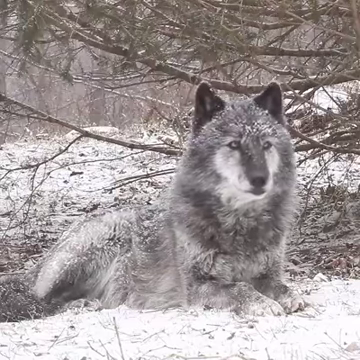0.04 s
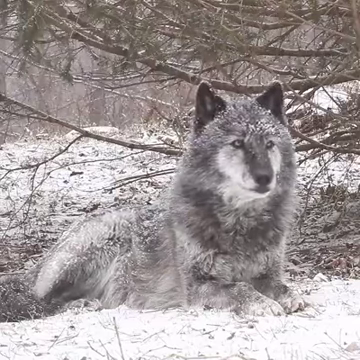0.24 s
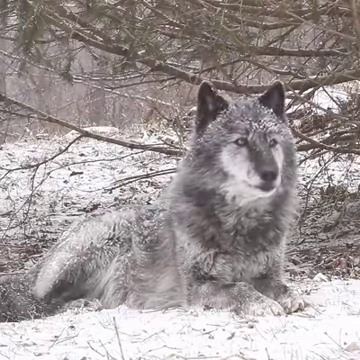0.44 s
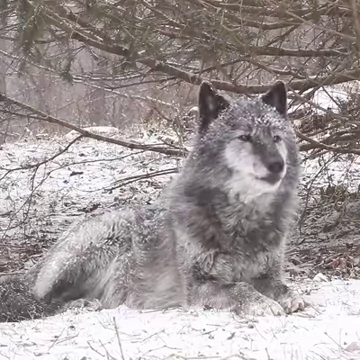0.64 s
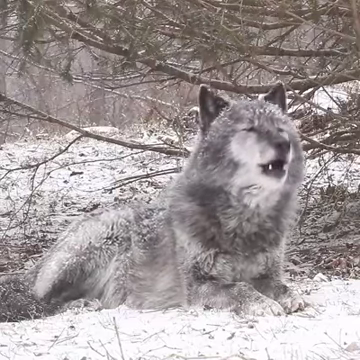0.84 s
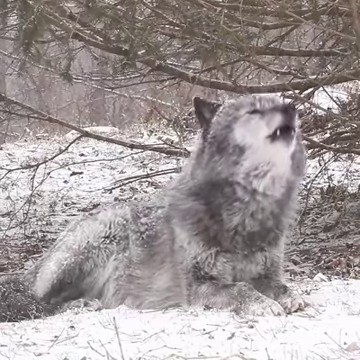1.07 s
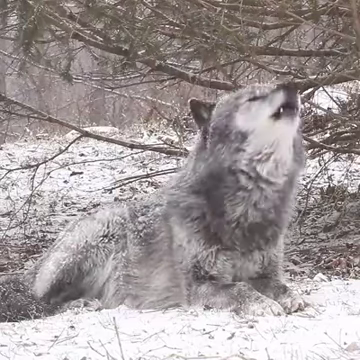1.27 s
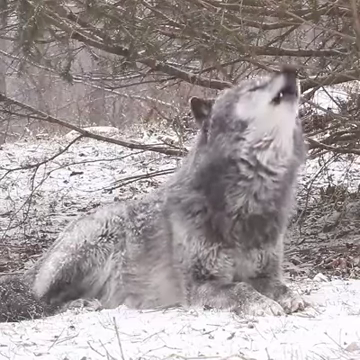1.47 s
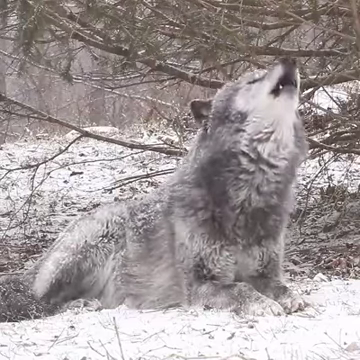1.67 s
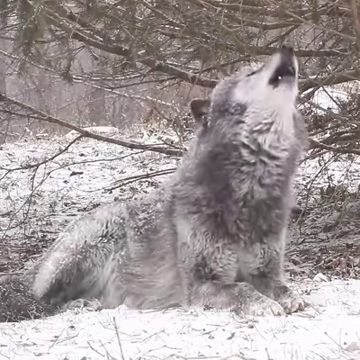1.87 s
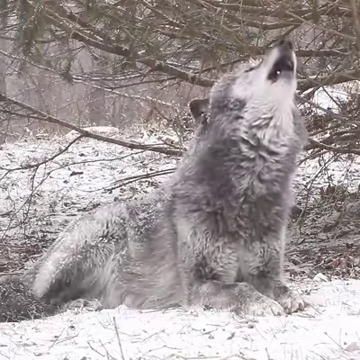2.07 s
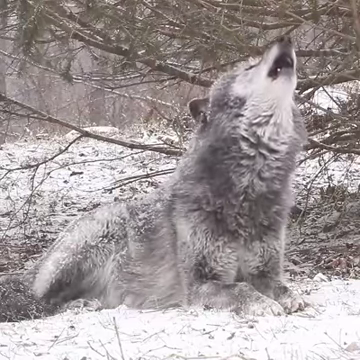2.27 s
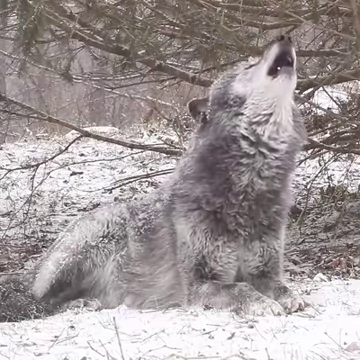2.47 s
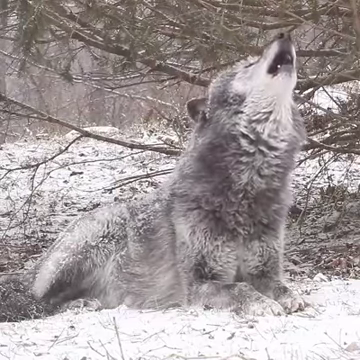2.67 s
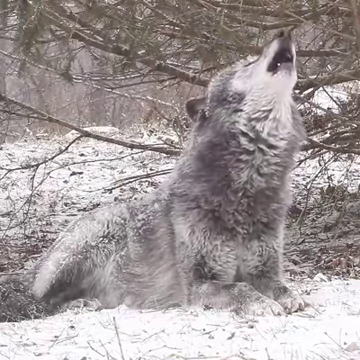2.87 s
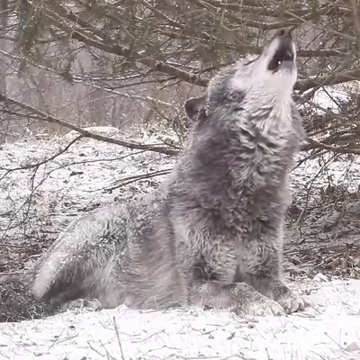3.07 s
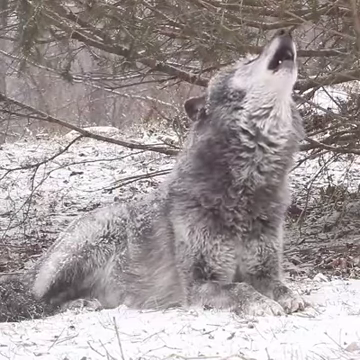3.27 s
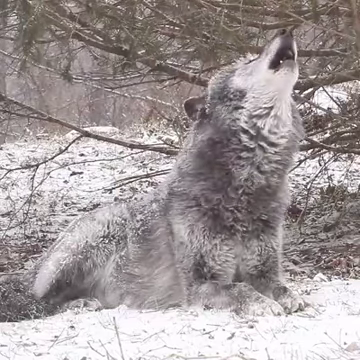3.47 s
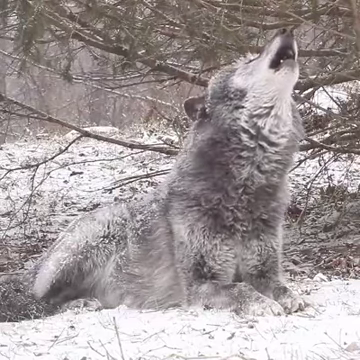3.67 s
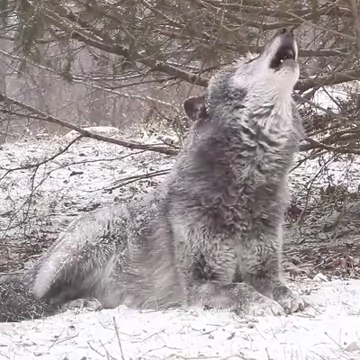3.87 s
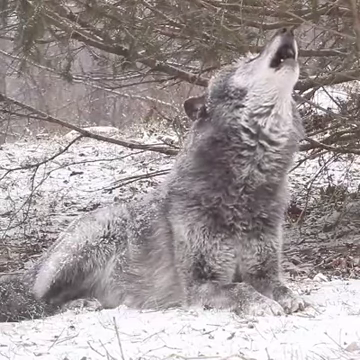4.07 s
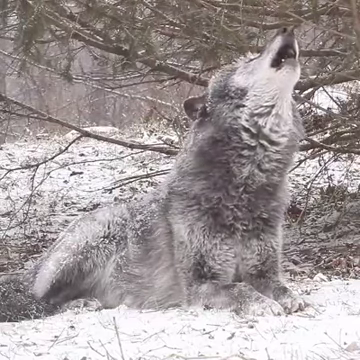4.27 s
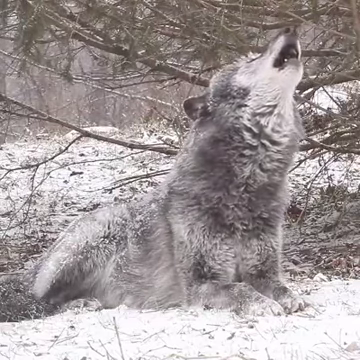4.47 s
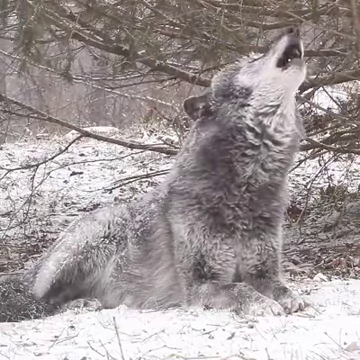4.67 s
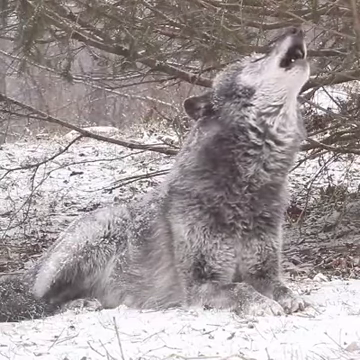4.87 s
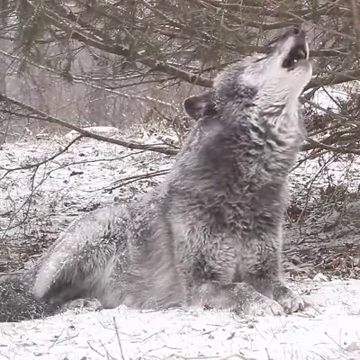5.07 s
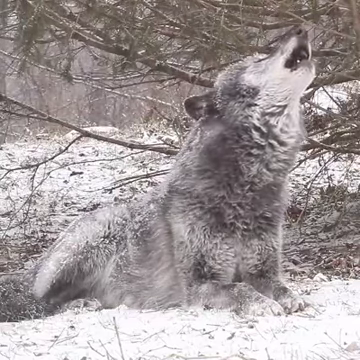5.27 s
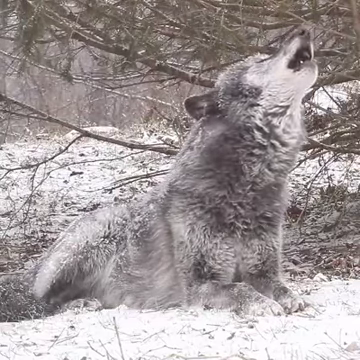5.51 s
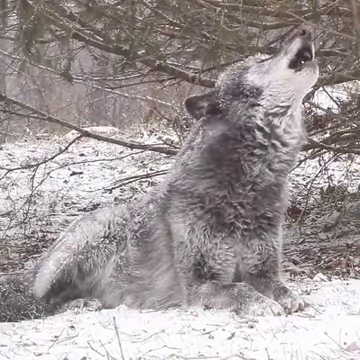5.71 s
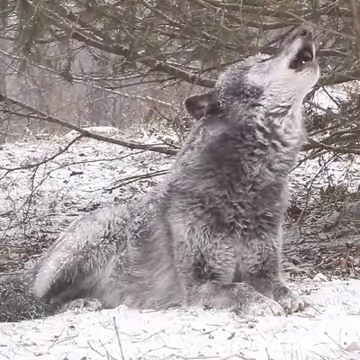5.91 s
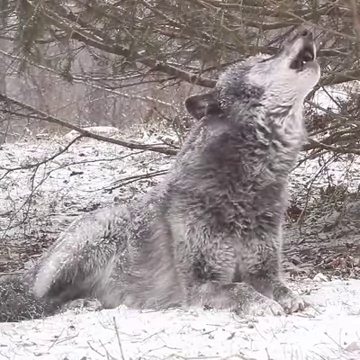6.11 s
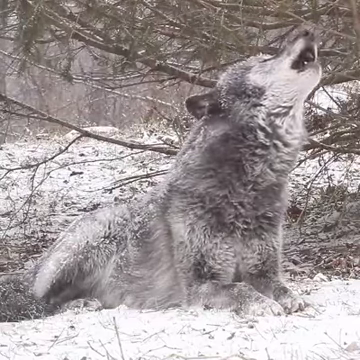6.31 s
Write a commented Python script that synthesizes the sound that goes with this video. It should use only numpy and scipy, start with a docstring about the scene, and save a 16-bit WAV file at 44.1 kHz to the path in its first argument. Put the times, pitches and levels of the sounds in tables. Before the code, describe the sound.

After a quiet snowy hush, a wolf lifts one long pure howl; a second breaks upward over it, and a faint distant third joins.

```python
"""A snowy wood hushes softly all the way through: shaped noise, with a few short, faint noise bursts.
A wolf starts one long howl at about 1.7 s: an almost pure tone, weak overtones, hissing breath and thin whistles.
At about 3.5 s a second wolf breaks up from a low note, rises above the first and sinks to nearly the same
pitch, so the two beat slowly. From about 5.3 s a third, far-off wolf joins as one faint, wavering tone.
Sparse echoes off the trunks follow the voices; a limiter evens the level, and the sound is nearly mono."""
import sys
import numpy as np
from scipy import signal
from scipy.fft import rfft, irfft, next_fast_len
from scipy.io import wavfile
from scipy.ndimage import uniform_filter1d

SR = 44100
rng = np.random.default_rng(int(sys.argv[2]) if len(sys.argv) > 2 else 0)


def dump_mix(stems):
    """Bounce the given channels to the path in sys.argv[1] as a 16-bit WAV at rate SR."""
    frames = np.atleast_2d(stems).T  # one column per channel
    limited = np.clip(frames, -1, 1)  # hard clip at full scale
    pcm = np.round(limited * 32767).astype(np.int16)
    wavfile.write(sys.argv[1], SR, pcm)


N = 279925
T = np.arange(N) / SR
EDGE_HZ = 15500  # upper limit of the overtones and of the whole sound


def gain_of(db):
    """Turns decibels into a factor."""
    return 10 ** (np.asarray(db) / 20)


def evened(x):
    """Scales a signal to rms 1."""
    return x / np.sqrt(np.mean(x ** 2) + 1e-20)


def read(points, hz):
    """Reads a spectrum curve on a logarithmic frequency axis."""
    f, value = np.transpose(points)
    return np.interp(np.log(hz + 1), np.log(f + 1), value)


def columns(rows):
    """Draws each column along time, then a soft-edged mask that is 1 while the table lasts."""
    s, *rest = np.transpose(rows)
    lasting = 1. * ((T > s[0]) & (T < s[-1]))
    return [np.interp(T, s, c) for c in rest] + [uniform_filter1d(lasting, size=400)]


def bump(s, length):
    """A smooth hump in time that peaks at 1."""
    return np.exp(-(2 * (T - s) / length) ** 2)


def wander(hz):
    """Random drift of rms 1, mostly slower than hz."""
    return evened(signal.lfilter(*signal.butter(2, hz, fs=SR), rng.standard_normal(N)))


def band(hz, width, n=N):
    """Noise passed twice through one resonance, which gives it a rounded peak."""
    b, a = signal.iirpeak(min(hz, .45 * SR), hz / width, fs=SR)
    once = signal.lfilter(b, a, rng.standard_normal(n))
    return evened(signal.lfilter(b, a, once))


def steep(hz, width):
    """Noise in a band with steep edges."""
    edges = [hz - width / 2, hz + width / 2]
    sos = signal.butter(3, edges, "bandpass", fs=SR, output="sos")
    return evened(signal.sosfilt(sos, rng.standard_normal(N)))


def bursts(rows, spread, grain_db):
    """Short noises that swell and fade, with a grainy level; spread is resonance width / centre."""
    out = np.zeros(N)
    for s, length, db, hz in rows:
        part = out[round(s * SR):][:round(length * SR)]
        steps = np.repeat(rng.standard_normal(60), 150)
        grain = gain_of(grain_db * uniform_filter1d(steps, size=100))[:len(part)]
        noise = band(hz, spread * hz, n=9000)[:len(part)]
        part += gain_of(db) * np.hanning(len(part)) * grain * noise
    return out


# colour of the hush: f/Hz, relative level/dB per Hz
HUSH_COLOUR = [(30, -52), (108, -1.5), (187, 0.5), (520, -8.5), (900, -6.5), (1600, -13.5), (2800, -25),
               (7000, -26.5), (8000, -38.5), (8900, -26.5), (15500, -35)]
# slow rise and fall of the hush: t/s, level change/dB
HUSH_SWELL = [(0, -1.5), (2.5, 4), (6.35, 1.5)]
HUSH_DB = -46.5  # rms level before the slow swell


def hush():
    """Broad outdoor noise with drifting patches and a treble that flickers."""
    frames, hz = N // 128 + 5, np.fft.rfftfreq(512, 1 / SR)
    a, b, patches = rng.standard_normal((frames, 257, 3)).T
    patches = uniform_filter1d(patches, size=8, axis=0)  # blend neighbouring frequencies
    patches = evened(uniform_filter1d(patches, size=16, axis=1))  # blend neighbouring moments
    flicker = evened(uniform_filter1d(rng.standard_normal(frames), size=5)) * (hz[:, None] > 2500)
    z = (a + 1j * b) * gain_of(0.44 * patches + 0.43 * flicker)
    white = signal.istft(z, nperseg=512, noverlap=384)[1][:N]
    colour = gain_of(read(HUSH_COLOUR, np.fft.rfftfreq(N, 1 / SR)))
    coloured = irfft(rfft(white) * colour, N)
    return gain_of(HUSH_DB + columns(HUSH_SWELL)[0]) * evened(coloured)


# short faint noises, some low and some high:
# start t/s, length t/s, level/dB before fade and grain, centre f/Hz
FAINT_BURSTS = [(.417, .02, -56, 12400), (.711, .01, -52, 12500), (2.65, .08, -32, 350),
                (2.64, .11, -46, 2800), (5.32, .045, -33, 700), (5.525, .045, -34, 600),
                (5.77, .045, -35, 550), (5.925, .045, -34, 650)]


def faint_bursts():
    """Short faint noise bursts in broad bands, some low and some high."""
    return bursts(FAINT_BURSTS, spread=1.1, grain_db=3.)


def scattered(x):
    """Repeats a sound sparsely at random delays, dying away by 60 dB in 0.8 s."""
    at = np.arange(900, SR, 40) + rng.integers(0, 40, (SR - 861) // 40)
    taps = np.zeros(SR + 40)
    taps[at] = rng.choice([-1., 1.], len(at)) * gain_of(-60 * at / SR / 0.8)
    return signal.fftconvolve(x, taps / np.linalg.norm(taps))[:N]


def line(rows, waver_hz, octave_db):
    """One tone wavering in pitch and level, with a weak octave above it."""
    hz, db, on = columns(rows)
    turns = 2 * np.pi * np.cumsum(hz + waver_hz * wander(42)) / SR
    level = np.sqrt(2) * gain_of(db + 2.9 * wander(5.1))
    return on * level * (np.cos(turns) + gain_of(octave_db) * np.cos(2 * turns))


# howl of the far wolf: t/s, f/Hz, level/dB
THIRD_HOWL = [(5.26, 768.3, -34), (5.4, 746, -24), (5.52, 732.5, -39.5), (5.64, 729.3, -24.5),
              (5.88, 710, -20), (6.04, 725, -23.5), (6.35, 725, -25)]


def third_wolf():
    """The far wolf: a faint tone whose pitch and level waver around its table."""
    return line(THIRD_HOWL, waver_hz=1.6, octave_db=-17.5)


WHISTLE_RISE_DB, WHISTLE_FADE_DB = 13.5, 18  # how far below its peak a whistle starts and ends


def whistle(start, peak, end, from_hz, to_hz, db):
    """Swells to its peak and fades while the pitch glides evenly."""
    peak_hz = np.interp(peak, [start, end], [from_hz, to_hz])
    return [(start, from_hz, db - WHISTLE_RISE_DB), (peak, peak_hz, db), (end, to_hz, db - WHISTLE_FADE_DB)]


# long whistle near the first wolf's sixth overtone, beating with it: t/s, f/Hz, level/dB
LONG_WHISTLE = [(1.82, 4180, -44), (1.95, 4158, -35.5), (2.3, 4154, -35.5), (2.9, 4166, -43.5),
                (3.2, 4180, -57.5)]
# thin whistles, mostly at their own pitch; the 6260 Hz one lies three steps of the first wolf's pitch above the
# long whistle: start t/s, peak t/s, end t/s, first f/Hz, last f/Hz, peak level/dB
WHISTLES = [(1.603, 1.63, 1.66, 2560, 2780, -43), (1.8, 2.1, 2.95, 6260, 6250, -52),
            (1.9, 2.06, 2.9, 6710, 6680, -49), (3.8, 4.17, 4.27, 9190, 9185, -48),
            (4.14, 4.23, 4.28, 10690, 10700, -46), (4.22, 4.275, 4.36, 2605, 2625, -37),
            (4.22, 4.255, 4.29, 3400, 3360, -39), (4.3, 4.35, 4.5, 3350, 3390, -38),
            (4.23, 4.3, 4.34, 3935, 3965, -42), (4.12, 4.26, 4.32, 5600, 5370, -43),
            (4.295, 4.325, 4.39, 5350, 5310, -34), (5.22, 5.36, 5.8, 4090, 3830, -51),
            (5.4, 5.72, 6.36, 3110, 3145, -48), (5.9, 6.2, 6.5, 4560, 4610, -46)]


def whistles():
    """Thin wavering tones that ride on the howls, mostly at their own pitch."""
    tables = [LONG_WHISTLE] + [whistle(*row) for row in WHISTLES]
    return sum(line(rows, waver_hz=7.8, octave_db=-38.5) for rows in tables)


# rasps as the voices start or break: start t/s, length t/s, level/dB before fade and grain, centre f/Hz
RASPS = [(1.65, .065, -50, 11000), (3.472, .03, -34, 1450), (3.558, .04, -26, 1050), (1.59, .2, -54, 4000),
         (4.23, .11, -41, 3700), (3.51, .11, -43, 4500)]


def rasps():
    """Rough scrapes in the voices: short bursts of noise in narrow bands."""
    return bursts(RASPS, spread=.25, grain_db=3.)


def squeal(step_hz, level, whistle_hz, first_step, steps_db):
    """The vocal folds chop a whistle, which gives lines at steps of the howl's pitch."""
    db, on = columns(level)
    total = 0
    for k, step_db in enumerate(steps_db, start=first_step):
        line_level = gain_of(db + step_db + 3.9 * wander(4.1))
        hz = whistle_hz + k * step_hz + 6 * wander(30)
        total = total + line_level * np.cos(2 * np.pi * np.cumsum(hz) / SR)
    return on * np.sqrt(2) * total


# chopped whistles of the second wolf: level curve (t/s, level/dB), whistle f/Hz,
# number of the lowest step, level/dB of each step upward, added to the curve
SECOND_SQUEALS = [([(3.76, -62), (4.05, -50), (4.26, -52)], 5245, 2, [-17, -15, -30, -20, 0, -9, -16]),
                  ([(4.33, -52), (4.75, -51), (4.96, -56)], 5238, 2, [-12, -10, -20, 0, -4, -10, -13]),
                  ([(3.75, -70), (4.45, -61), (4.96, -62)], 10500, 3, [0, -2, -5])]


def second_squeals(hz):
    """The second wolf's high whistles, chopped at its own pitch."""
    return sum(squeal(hz, *row) for row in SECOND_SQUEALS)


# chopped whistles of the first wolf: level curve (t/s, level/dB), whistle f/Hz,
# number of the lowest step, level/dB of each step upward, added to the curve
FIRST_SQUEALS = [([(1.82, -63), (2.3, -59), (2.9, -67), (4.8, -62)], 10145, -1, [-5, 0, -15, -20, -2]),
                 ([(1.9, -72), (2.35, -63), (3.3, -73)], 14645, -3, [-7, -4, -6, 0])]


def first_squeals(hz):
    """The first wolf's high whistles, chopped at its own pitch."""
    return sum(squeal(hz, *row) for row in FIRST_SQUEALS)


def scooped(pitch, start, depth_hz, settle_s):
    """The held pitch, reached from below."""
    return columns(pitch)[0] - depth_hz * np.exp(-np.maximum(T - start, 0) / settle_s)


def roughness(spells):
    """How many times more the cycles waver during rough spells."""
    return 1 + sum(more * bump(s, length) for s, length, more in spells)


# a voice starts as a murmur with the mouth nearly shut, then the folds swing fully
MURMUR_S, MURMUR_DB, SHUT_DB, ATTACK_S = 0.022, -26, -10, 0.015
WAVER = .025  # phase waver of a calm voice in radians, times the overtone number
# resonances that colour the air hissing past the folds: f/Hz, width f/Hz, level/dB
MOUTH = [(2490, 700, -52.5), (3900, 940, -48.5), (6540, 3400, -64), (9850, 1000, -60), (13000, 3500, -67)]


def howl(hz, lead, effort, throat, swells, shimmer_db, breath_db, rough):
    """An almost pure fundamental; weak overtones shaped by the throat, and hiss in bands."""
    level_db, mouth_db, _ = columns(effort)
    before = effort[0][0] - T
    quiet = np.clip(before / ATTACK_S, 0, 1)
    on = np.clip((ATTACK_S + MURMUR_S - before) / ATTACK_S, 0, 1)
    level_db = level_db + MURMUR_DB * quiet
    mouth_db = mouth_db + SHUT_DB * quiet

    # both voices count their cycles from the moment of the second wolf's break
    cycles = np.cumsum(hz) / SR
    turns = 2 * np.pi * (cycles - np.interp(SECOND_SCOOP[0], T, cycles) + lead)
    tone = gain_of(level_db + 0.27 * wander(35)) * np.cos(turns)
    voiced = np.clip(gain_of(level_db + 26 + SHUT_DB * quiet), 0, 1)  # overtones start once the folds swing fully

    def opened(f):
        """An open mouth frees the treble most."""
        return gain_of(mouth_db * np.clip(np.log2(f / 1100) / 1.2, 0, 1.3))

    overtones = 0
    for k in range(2, 22):
        swell_db = sum(db * bump(s, length) for n, s, length, db in swells if round(n) == k)
        level = gain_of(read(throat, k * hz) + swell_db + shimmer_db * wander(9.9))
        level = level * opened(k * hz) * (k * hz < EDGE_HZ)
        # overtones also waver in phase; k * k spreads their starting points
        wavering = turns + WAVER * rough * wander(40)
        overtones = overtones + level * np.cos(k * wavering + k * k)

    gusts_db = 1.5 * wander(15)
    breath = sum(gain_of(db + gusts_db) * opened(f) * steep(f, w) for f, w, db in MOUTH)
    return on * (np.sqrt(2) * tone + voiced * (np.sqrt(2) * overtones + gain_of(breath_db) * breath))


# held pitch of the second wolf; its small gap to the first sets the moments of the beats: t/s, f/Hz
SECOND_PITCH = [(3.78, 746.03), (4.16, 757.91), (4.22, 768.52), (4.31, 810.73), (4.35, 792.43),
                (4.48, 775.52), (4.7, 759.89), (4.88, 752.35), (5.0, 714.64), (5.27, 696.45),
                (5.39, 691.01), (5.87, 687.08), (5.99, 695.01), (6.11, 696.03), (6.35, 692.55)]
# scoop up to that pitch: start t/s, depth f/Hz, settling t/s
SECOND_SCOOP = (3.577, 194.08, .05)
# low note before the break: rise starts t/s, f/Hz, rise/Hz per s
LOW_NOTE = (3.53, 384, 700)
BREAK_S = .014  # length of the break


def second_hz():
    """A low rising note that breaks upward into the howl."""
    start, low_hz, rise = LOW_NOTE
    low = low_hz + rise * np.maximum(T - start, 0)
    broken = np.clip((T - SECOND_SCOOP[0]) / BREAK_S + 1, 0, 1)
    return low + (scooped(SECOND_PITCH, *SECOND_SCOOP) - low) * broken


# t/s, fundamental level/dB, mouth opening as level/dB on overtones and breath
SECOND_EFFORT = [(3.486, -7.5, -10), (3.563, -6.5, -1.5), (3.58, -17.5, -19.5), (3.63, -9.5, -9),
                 (3.7, -5, 0.7), (3.9, -14, 0), (4.0, -12.5, 2), (4.3, -21.5, -1), (4.401, -29.5, 3.5),
                 (4.502, -12, 1), (4.8, -16.5, 1.1), (5.0, -5.5, -3.5), (5.2, -2.5, -1), (5.4, -9, -4.5),
                 (6.0, -6, -7.5), (6.36, -7.5, -6)]
# overtone strength by frequency, at mouth opening 0: f/Hz, level/dB
SECOND_THROAT = [(1150, -27.5), (1500, -28.5), (2250, -53), (3130, -48.5), (3850, -40.5), (4500, -55),
                 (5600, -64.5), (8200, -89)]
# single overtones that swell or dip while the mouth changes shape:
# overtone number, middle t/s, length t/s, level change/dB
SECOND_SWELLS = [(3, 3.48, .035, -14), (4, 3.555, .13, -16), (3, 3.75, 0.18, 23.5), (3, 4.8, 0.38, 20),
                 (2, 4.29, .1, -12), (4, 4.43, 0.45, 13), (10, 3.53, .09, 11), (11, 3.53, .06, 17),
                 (12, 3.55, .06, 22), (4, 3.615, .035, 26), (5, 4.4, .22, 6), (7, 5.03, 0.36, 18),
                 (7, 4.9, 0.085, -60), (5, 5.9, 1.5, -10), (2, 5.7, 1.1, 5)]
# rough spells at the break and the peak: middle t/s, length t/s, extra waver (times calm)
ROUGH_SPELLS = [(3.575, .05, 20), (4.285, .09, 20)]
SECOND_LEAD = 0.37  # cycles the second voice leads the first at the break


def second_wolf(hz):
    """The second voice, which turns rough at its break and at its peak."""
    return howl(hz, SECOND_LEAD, SECOND_EFFORT, SECOND_THROAT, SECOND_SWELLS,
                shimmer_db=1.5, breath_db=0.0, rough=roughness(ROUGH_SPELLS))


# held pitch of the first wolf: t/s, f/Hz
FIRST_PITCH = [(1.9, 683.69), (2.0, 700.86), (2.1, 703.0), (2.6, 689.75), (3.0, 684.53), (3.4, 690.67),
               (3.6, 687.12), (4.2, 692.86), (6.35, 680.64)]
# scoop up to that pitch: start t/s, depth f/Hz, settling t/s
FIRST_SCOOP = (1.69, 69, .06)


def first_hz():
    """One long held note, scooped up from below."""
    return scooped(FIRST_PITCH, *FIRST_SCOOP)


# t/s, fundamental level/dB, mouth opening as level/dB on overtones and breath
FIRST_EFFORT = [(1.708, -6.5, -7), (1.799, -2, -4.5), (1.951, -6, 2.5), (2.5, -5, 3.5), (2.8, -3.5, -0.6),
                (3.549, -3, 0), (3.701, -6, -1.5), (4.451, -7, -5), (4.899, -10, -11), (5.25, -3.5, -7.5),
                (5.649, -9.5, -17), (6.36, -12.5, -17.5)]
# overtone strength by frequency, at mouth opening 0: f/Hz, level/dB
FIRST_THROAT = [(1380, -45), (2080, -50.5), (2780, -51), (3480, -59), (4180, -41.5), (4900, -69.5),
                (6270, -64), (7600, -92)]
# single overtones that swell while the mouth changes shape:
# overtone number, middle t/s, length t/s, level change/dB
FIRST_SWELLS = [(2, 1.742, .04, 7), (4, 1.795, 0.12, 16)]


def first_wolf(hz):
    """The first voice: one long howl without rough spells."""
    return howl(hz, 0, FIRST_EFFORT, FIRST_THROAT, FIRST_SWELLS,
                shimmer_db=2.0, breath_db=-4.0, rough=roughness([]))


def scene():
    """Three wolves, their echoes, faint noise bursts and the hush, in two nearly equal channels."""
    first_pitch, second_pitch = first_hz(), second_hz()
    wolves = first_wolf(first_pitch) + second_wolf(second_pitch) + third_wolf()
    squeals = first_squeals(first_pitch) + second_squeals(second_pitch)
    pack = wolves + whistles() + squeals + rasps()
    echoes = gain_of(-26) * scattered(pack)  # off the trunks
    mid = pack + echoes + hush() + faint_bursts()
    side = gain_of(-63.5) * scattered(mid)  # a very faint diffuse difference between left and right
    return np.array([mid + side, mid - side])


def record(dry):
    """A limiter flattens the crests of the slow beats; then a filter cuts the top treble."""
    envelope = abs(signal.hilbert(dry.mean(0), next_fast_len(N))[:N])
    crest_db = 20 * np.log10(envelope + 1e-9)
    fall = T * 43.0  # the held crest falls 43 dB a second
    held_db = np.maximum.accumulate(crest_db + fall) - fall
    over_db = np.maximum(held_db + 1.36, 0)  # limits above -1.36 dB
    smooth_db = uniform_filter1d(uniform_filter1d(over_db, size=400), size=400)
    limited = dry / gain_of(smooth_db)
    lowpass = signal.firwin(1023, EDGE_HZ, window=("kaiser", 9), fs=SR)
    return signal.oaconvolve(limited, lowpass[None], "same")


dry = scene()
out = record(dry)
dump_mix(out)
```